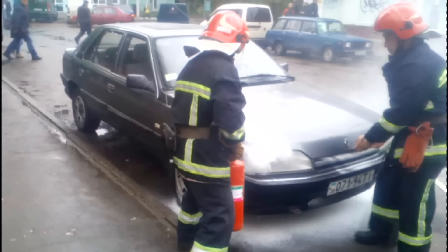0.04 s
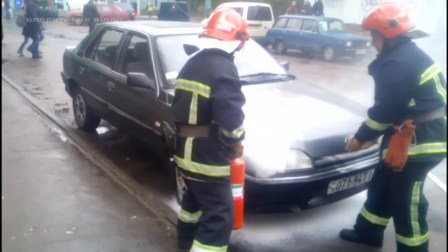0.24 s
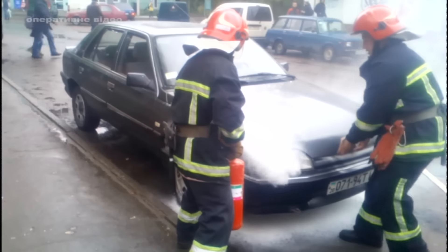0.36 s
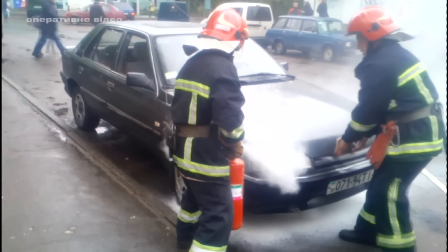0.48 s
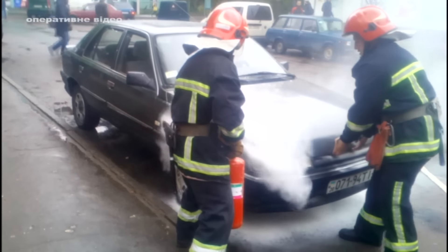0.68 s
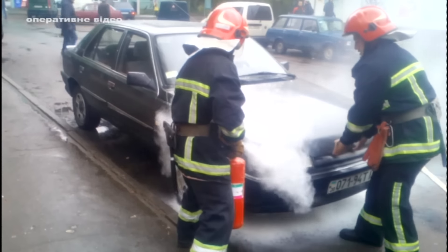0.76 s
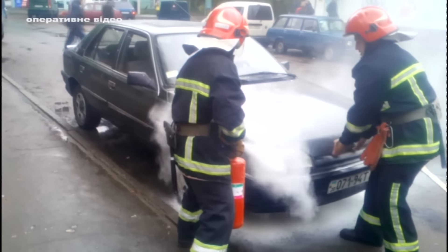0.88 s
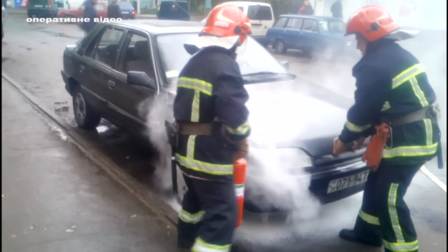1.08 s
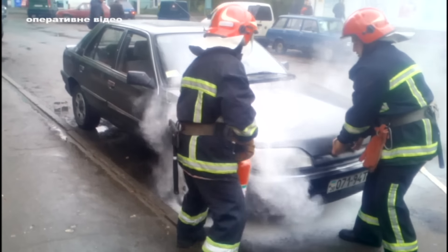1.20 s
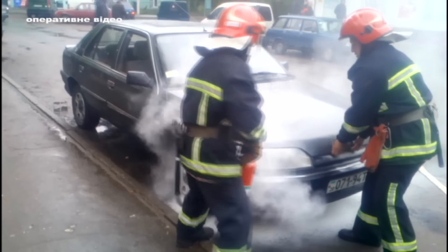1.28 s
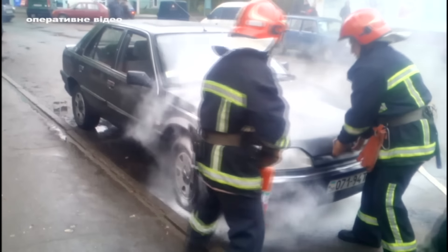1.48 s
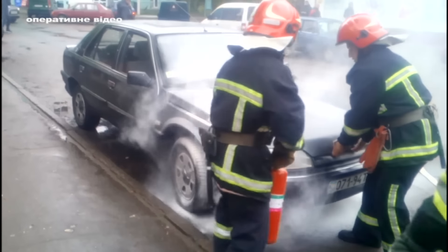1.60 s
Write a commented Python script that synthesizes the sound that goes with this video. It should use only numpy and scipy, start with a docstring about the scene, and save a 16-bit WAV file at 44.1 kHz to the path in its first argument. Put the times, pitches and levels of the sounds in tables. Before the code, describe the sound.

Loud rushing extinguisher spray, dying away quickly into a sharp clack and small handling clicks.

```python
"""In an open yard a fire extinguisher sprays a car: turbulence noise, coloured by reflections, cuts in.
Its low roar builds within the first tenth of a second, and a slight swell marks the sweep of the nozzle.
An engine idles throughout as wavering harmonics, above the low rumble of the yard as shaped noise.
As the valve closes the hiss dies away and one handling click, a noise burst, is heard; then a clack,
probably the lever, sounds as noise, ringing modes and echo, and four more clicks follow."""
import sys
import numpy as np
from scipy import signal
from scipy.fft import rfft, irfft
from scipy.io import wavfile

SR = 44100
rng = np.random.default_rng(int(sys.argv[2]) if len(sys.argv) > 2 else 0)


def dump_mix(stems):
    """Bounce the given channels to the path in sys.argv[1] as a 16-bit WAV at rate SR."""
    frames = np.atleast_2d(stems).T  # one column per channel
    limited = np.clip(frames, -1, 1)  # hard clip at full scale
    pcm = np.round(limited * 32767).astype(np.int16)
    wavfile.write(sys.argv[1], SR, pcm)


N = 72765

# Shape of the jet's spectral density: f/Hz, level/dB
JET_SPECTRUM = [(100, -13), (250, 1.5), (400, -4), (800, -3), (1400, -3.5), (2300, 2.5), (3200, -.5),
                (4500, -2.5), (5200, -7), (6200, -8.5), (7500, -19.5), (10500, -32), (13500, -28),
                (15500, -42)]
# Fixed bands that colour the hiss: f/Hz, width/Hz, lift/dB
JET_COLOUR_BANDS = [(500, 110, 2), (1160, 140, 3.5), (1700, 140, 4.5), (4400, 260, 3)]
# Correlation of the hiss between left and right: f/Hz, correlation/1
JET_CORRELATION = [(100, .99), (300, 0.91), (650, 0.97), (1400, 0.64), (3100, 0.75), (4500, 0.7),
                   (7000, 0.45), (15000, 0.4)]
# Phase by which the hiss leads at the left port: f/Hz, phase/rad
JET_PHASE_LEAD = [(1900, 0), (2700, 0.74), (3600, -1.1), (5100, 3), (7000, 3), (10000, 5.5), (15000, 13)]
# Clack noise by band: f/Hz, relative density level/dB, lateness/s, T60/s
CLACK_BANDS = [(150, -8, 0.007, 0.14), (295, -8.5, 0.012, .12), (597, 5, 0.0016, 0.19),
               (880, -6, 0.00069, .1), (1400, 5.5, 0.00062, 0.085), (2580, 1.5, 0.00056, 0.087),
               (3470, 0.5, 0.0004, 0.081), (4760, 7.5, 0.00045, 0.04), (5970, -9, 0.00054, 0.033),
               (7450, -13, .0002, 0.035), (10100, -27, .0002, 0.044), (14000, -27, .0002, 0.043)]
# Correlation of the clack noise between left and right: f/Hz, correlation/1
CLACK_CORRELATION = [(200, 0.89), (650, .96), (1400, .85), (3100, 0.11), (4600, .75), (7000, 0.11),
                     (15000, 0)]
# Ringing modes of the body: f/Hz, peak level before the decay/dB, T60/s
BODY_MODES = [(256.3, -13.5, 0.1), (273.2, -22, 0.3), (492.4, -25, 0.14), (680.3, -17, 0.12),
              (1392, -25.5, 0.086), (1497, -30, .08), (1720, -25, 0.14), (1914, -20.5, 0.066),
              (2507, -19, 0.061), (3846, -17.5, 0.025), (4535, -6, 0.02), (4770, -16, 0.045),
              (5320, -21, 0.037), (6550, -26.5, 0.028)]
# Shape of the echo's spectral density: f/Hz, level/dB
ECHO_SPECTRUM = [(150, -13), (300, -1), (700, 10), (1500, 1.5), (4500, -1), (7000, -15.5), (14000, -38)]
# Handling clicks: t/s, level/dB, rise/s, T60/s, treble tilt/(dB per octave), bright band f/Hz
HANDLING_CLICKS = [(1.245, -34.5, .003, 0.042, 1, 4400), (1.372, -35.5, 0.0026, 0.068, -1, 5100),
                   (1.514, -37, 0.0099, 0.11, -2.5, 3900), (1.609, -31.5, 0.0059, 0.074, 2, 4500),
                   (1.622, -32.5, 0.0032, 0.14, -4.5, 2720)]
# Shape of the spectral density common to the clicks: f/Hz, level/dB
CLICK_SPECTRUM = [(200, -5), (700, 7), (1500, 1.5), (2800, 2.5), (4500, 1), (6000, -2.5), (9000, -17.5),
                  (14000, -29)]
# Correlation of the clicks between left and right: f/Hz, correlation/1
CLICK_CORRELATION = [(200, .97), (1500, 0.65), (4500, 0.45), (9000, 0.11)]
# Engine harmonics: harmonic number/1, rms level/dB
ENGINE_HARMONICS = [(1, -64.5), (2, -39), (3, -42.5), (4, -56), (5, -49)]
# Shape of the yard's spectral density: f/Hz, level/dB
YARD_SPECTRUM = [(15, -63), (25, -37), (66, -10), (86, -17), (150, -7), (373, -16), (450, -16.5),
                 (573, -22), (749, -16), (1150, -28.5), (3930, -29.5), (15000, -74.5)]
# Correlation of the yard and the echo between left and right: f/Hz, correlation/1
YARD_CORRELATION = [(100, 0.96), (500, 0.84), (1500, 0.2), (6000, 0.087)]
# Microphone ports: f/Hz, left minus right level/dB
PORT_DIFFERENCE = [(200, -0.2), (700, -0.5), (1250, 3), (1700, 3), (2100, -6.5), (2650, -3), (3400, -2.5),
                   (4400, -9.5), (5400, -0.5), (6300, 4), (7800, 10.5), (10000, 2), (14000, -15)]

SIDES = np.array([[1], [-1]])  # sign for left and right

# Names ending in _DB are in decibels, _S in seconds, _HZ in hertz; levels are those ahead of the ports
START_S, TOP_HZ, CEILING = 0.084, 15600, 0.88  # ceiling in units of full scale
JET_DB = -27.5
SWELL_DB, SWELL_S, SWELL_WIDTH_S = 0.68, 0.7, 0.17  # slight swell as the nozzle sweeps
SURGE_DB, SURGE_RATE_HZ, FLICKER_DB, FLICKER_RATE_HZ = 0.3, 35, 1.5, 90
ROAR_BUILD_DB, ROAR_BUILD_S, ROAR_BELOW_HZ = 14, 0.048, 680
CLOSE_S, CLOSE_LEN_S, CLOSE_DROP_DB, CLOSE_POWER = 1.147, 0.18, 21.5, 1.19
BOUNCE_S, BOUNCE_GAIN = 0.001845, 0.35  # reflection off a hard surface close to the jet
SCATTER_FROM_S, SCATTER_TO_S, SCATTER_GAIN = 0.003, 0.024, 0.39  # off the car and the ground
PORT_LAG_S = 0.00005  # arrival offset at either port for sound from the side
CLACK_S, CLACK_RISE_S, CLACK_SWELL_DB, CLACK_DB = 1.3182, 0.0078, 8, -10.5
BODY_RISE_S, BODY_BUILD_CYCLES = 0.0068, 2.0
ECHO_DB, ECHO_T60_S, ECHO_DELAY_S = -29, 0.33, 0.024
CLICK_BAND_DB, CLICK_BAND_WIDTH_HZ = 6.5, 740
KNOCK_PAN_DB = 1.2  # left minus right, for clack and clicks
FIRING_HZ, ENGINE_WANDER, ENGINE_WAVER_DB = 48.7, 0.0058, 1.6  # wander as a fraction of frequency
YARD_DB, YARD_FLICKER_DB = -38, 1.0


def undb(db):
    """Level: amplitude gain is ten to the power of decibels over twenty."""
    return 10 ** (np.asarray(db) / 20)


def at(table, hz, column=1):
    """Interpolation: a table column is read linearly along a logarithmic frequency axis."""
    rows = np.array(table, float)
    return np.interp(np.log(np.maximum(hz, 1)), np.log(rows[:, 0]), rows[:, column])


def bins():
    """Discrete Fourier transform: its bins lie SR / N hertz apart."""
    return np.arange(N // 2 + 1) * SR / N


def walk(rate):
    """Smooth random fluctuation: white noise under a Gaussian low-pass, scaled to unit deviation."""
    k = max(int(SR / rate), 2)
    lowpass = np.exp(-(bins() * k / SR * 2) ** 2)
    wander = irfft(rfft(rng.standard_normal(N)) * lowpass, N)
    return (wander - wander.mean()) / wander.std()


def noise_bands(db, correlation, count=17):
    """Partial coherence: mid and side noise give stereo of rms 1, split into (centre Hz, band) pairs."""
    f, gain = bins(), undb(db)
    alike = np.clip(at(correlation, f), -1, 1)
    mid, side = rfft(rng.standard_normal((2, N)))
    both = np.sqrt((1 + alike) / 2) * mid + SIDES * np.sqrt((1 - alike) / 2) * side
    both = both * gain / np.sqrt(np.mean(gain ** 2))
    centres = np.geomspace(100, 14000, count)
    bands = []
    for hz, share in zip(centres, np.eye(count)):
        overlap = at(np.c_[centres, share], f)  # triangular weights that sum to one
        bands.append((hz, irfft(both * overlap, N)))
    return bands


def noise(db, correlation):
    """Superposition: overlapping bands add up to stereo noise of rms 1 with the given spectrum."""
    return sum(band for hz, band in noise_bands(db, correlation, count=2))


def decay_from(age, t60):
    """Reverberant decay: amplitude falls exponentially by 60 dB in each T60 after age zero."""
    return np.exp(-np.log(1000) * np.maximum(age, 0) / t60)


def strike(age, rise, t60):
    """Transient excitation: a smooth sine-squared rise precedes exponential decay."""
    attack = np.sin(np.pi / 2 * np.clip(age / max(rise, 1e-4), 0, 1)) ** 2
    return attack * decay_from(age - rise, t60)


def jet(t):
    """Turbulence noise: random pressure, combed by reflections, follows the flow until the valve closes."""
    f = bins()
    colour = at(JET_SPECTRUM, f) + 20 * np.log10(reflections() + 1e-6)
    for hz, width, db in JET_COLOUR_BANDS:
        colour = colour + db * np.exp(-2 * ((f - hz) / width) ** 2)
    swell_db = SWELL_DB * np.exp(-((t - SWELL_S) / SWELL_WIDTH_S) ** 2)
    closing = (np.maximum(t - CLOSE_S, 0) / CLOSE_LEN_S) ** CLOSE_POWER
    flow_db = JET_DB + swell_db - CLOSE_DROP_DB * closing + SURGE_DB * walk(SURGE_RATE_HZ)
    # the low roar grows after the hiss has begun
    roar_db = -ROAR_BUILD_DB * np.exp(-np.maximum(t - START_S, 0) / ROAR_BUILD_S)
    hiss = 0
    for hz, band in noise_bands(colour, JET_CORRELATION):
        low_share = 1 / (1 + (hz / ROAR_BELOW_HZ) ** 2)
        hiss = hiss + band * undb(FLICKER_DB * walk(FLICKER_RATE_HZ) + roar_db * low_share)
    lead = np.exp(0.5j * SIDES * at(JET_PHASE_LEAD, f))  # half the phase on each side
    return undb(flow_db) * irfft(rfft(hiss) * lead, N)


def reflections(count=14):
    """Interference: a strong delayed copy and scattered weak ones comb the spectrum at each side."""
    f = bins()

    def delayed(s):
        """Time shift: a delay turns phase in proportion to frequency."""
        return np.exp(-2j * np.pi * f * s)

    scatter = 0
    for when, angle in rng.random((count, 2)):
        delay = SCATTER_FROM_S + (SCATTER_TO_S - SCATTER_FROM_S) * when
        scatter = scatter + delayed(delay + SIDES * PORT_LAG_S * (2 * angle - 1))
    return np.abs(1 + BOUNCE_GAIN * delayed(BOUNCE_S) + SCATTER_GAIN * scatter / np.sqrt(count))


def clack(t):
    """Impact: parts grind home in a swelling crunch, body modes ring and the yard returns an echo."""
    age = t - CLACK_S
    return crunch(age) + body(age) + echo(age)


def crunch(age):
    """Contact noise: each band sets in after its own delay, swells for a few ms and decays."""
    out = 0
    for hz, band in noise_bands(at(CLACK_BANDS, bins()), CLACK_CORRELATION):
        since = age - at(CLACK_BANDS, hz, column=2)
        swell_db = CLACK_SWELL_DB * np.clip(since / CLACK_RISE_S - 1, -1, 0)
        decay = decay_from(since - CLACK_RISE_S, at(CLACK_BANDS, hz, column=-1))
        onset = np.clip(since / 0.00039, 0, 1)  # ramp in seconds
        out = out + band * undb(CLACK_DB + swell_db) * decay * onset
    return out


def body(age):
    """Modal resonance: damped sinusoids ring, the low ones taking longer to build up."""
    out = 0
    for hz, db, t60 in BODY_MODES:
        envelope = strike(age, BODY_RISE_S + BODY_BUILD_CYCLES / hz, t60)
        out = out + undb(db) * envelope * np.sin(2 * np.pi * (hz * age + rng.random()))
    return out


def echo(age):
    """Diffuse reflection: noise builds up over the delay and then decays exponentially."""
    envelope = strike(age, ECHO_DELAY_S, ECHO_T60_S)
    return undb(ECHO_DB) * envelope * noise(at(ECHO_SPECTRUM, bins()), YARD_CORRELATION)


def handling(t):
    """Friction: short scraping noise bursts of handle and hose, each with one bright band."""
    f, out = bins(), 0
    octaves = np.log2(np.maximum(f, 100) / 3000)  # tilt pivots at 3 kHz
    for s, db, rise, t60, tilt, hz in HANDLING_CLICKS:
        bright_db = CLICK_BAND_DB * np.exp(-((f - hz) / CLICK_BAND_WIDTH_HZ) ** 2)
        colour = at(CLICK_SPECTRUM, f) + tilt * octaves + bright_db
        out = out + undb(db) * strike(t - s, rise, t60) * noise(colour, CLICK_CORRELATION)
    return out


def engine():
    """Periodic excitation: firing gives harmonics of one wandering fundamental, each wavering in level."""
    firing_hz = FIRING_HZ * (1 + ENGINE_WANDER * walk(3.5))
    phase = 2 * np.pi * np.cumsum(firing_hz) / SR
    out = 0
    for k, db in ENGINE_HARMONICS:
        peak = np.sqrt(2) * undb(db + ENGINE_WAVER_DB * walk(4))  # rms to peak
        out = out + peak * np.sin(round(k) * phase + 2 * np.pi * rng.random())
    return out


def yard():
    """Ambient noise: a low rumble of the surroundings, whose bands fluctuate independently."""
    bands = noise_bands(at(YARD_SPECTRUM, bins()), YARD_CORRELATION)
    return undb(YARD_DB) * sum(band * undb(YARD_FLICKER_DB * walk(37)) for hz, band in bands)


def scene():
    """Superposition: the pressures of all sources add at the microphone."""
    t = np.arange(N) / SR
    knocks = (clack(t) + handling(t)) * undb(SIDES * KNOCK_PAN_DB / 2)
    return jet(t) + knocks + engine() + yard()


def record(dry):
    """Linear filtering and saturation: ports colour, the sound cuts in, peaks round, the top is cut."""
    t = np.arange(N) / SR
    f = np.arange(N + 1) * SR / (2 * N)
    ports = undb(SIDES * at(PORT_DIFFERENCE, f) / 2)
    ports = ports / np.sqrt(np.mean(ports ** 2, axis=0))  # mean power of the two ports stays 1
    mirrored = np.c_[dry, dry[:, ::-1]]  # keeps the two ends from wrapping into each other
    coloured = irfft(rfft(mirrored) * ports)[:, :N]
    heard = coloured * np.clip((t - START_S) / 0.0037, 0, 1)  # ramp in seconds
    rounded = heard / (1 + (heard / CEILING) ** 8) ** (1 / 8)
    lowpass = signal.ellip(10, 0.1, 90, TOP_HZ, fs=SR, output="sos")
    return signal.sosfilt(lowpass, rounded)


dry = scene()
out = record(dry)
dump_mix(out)
```